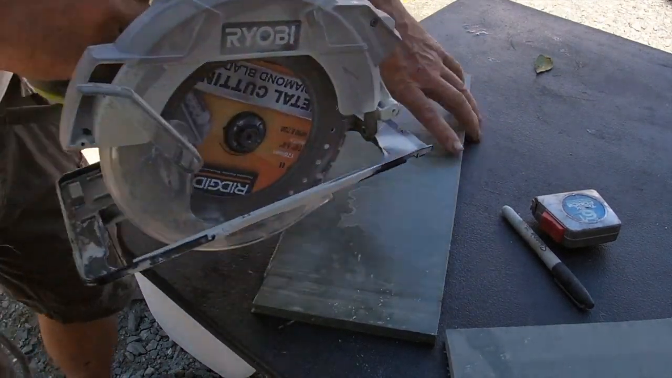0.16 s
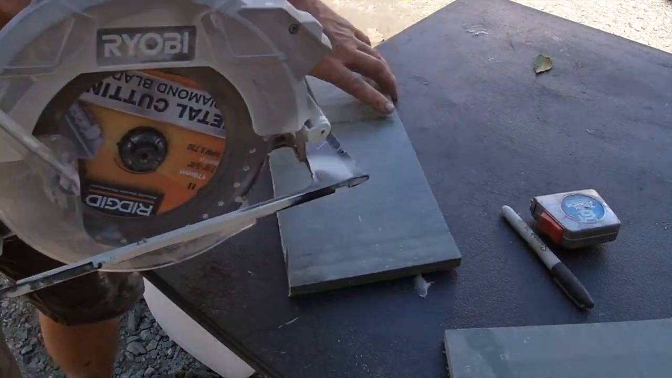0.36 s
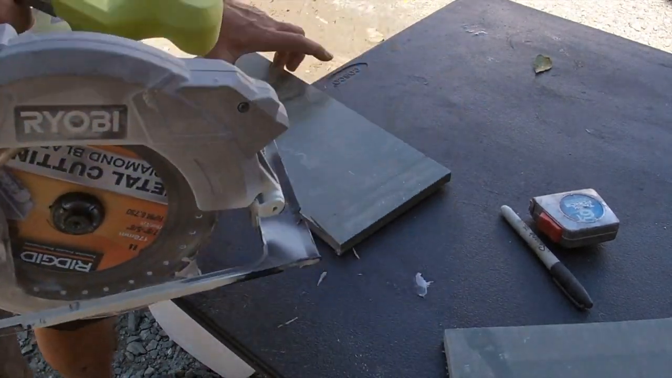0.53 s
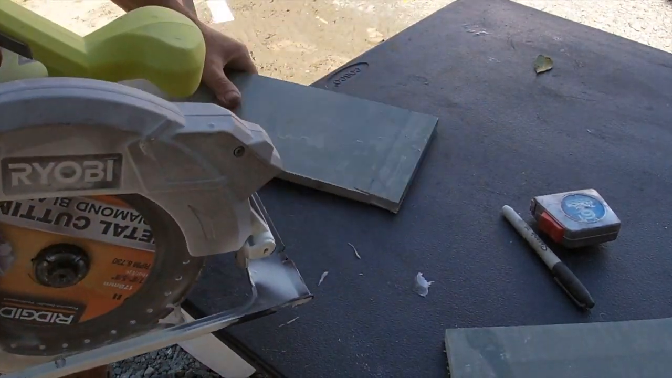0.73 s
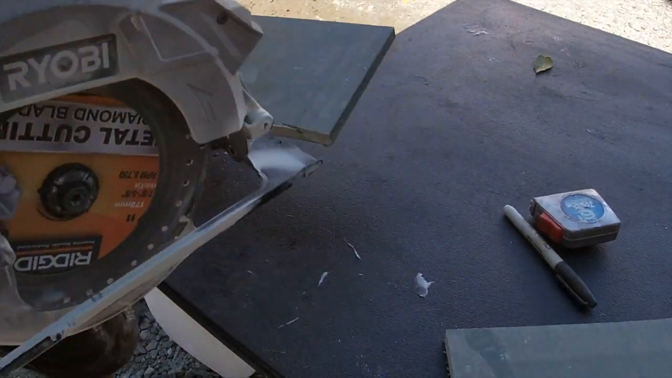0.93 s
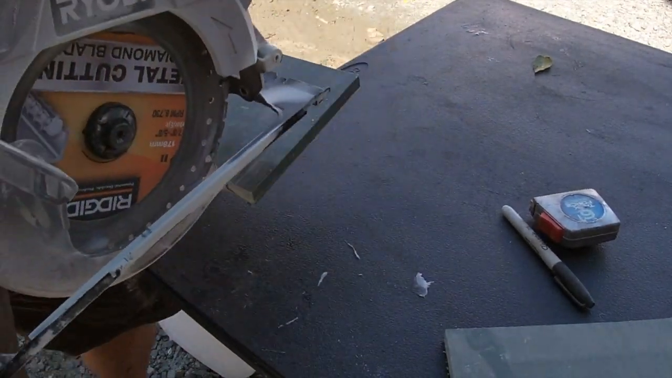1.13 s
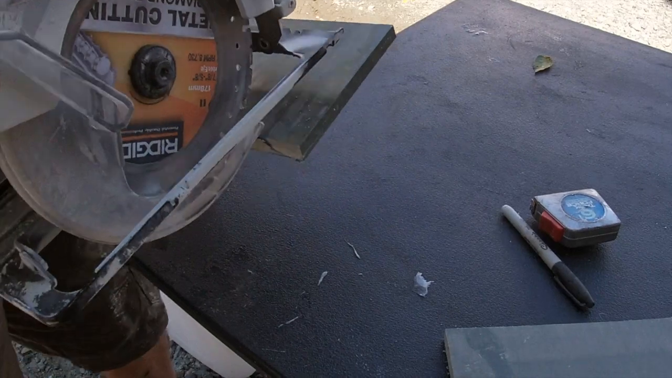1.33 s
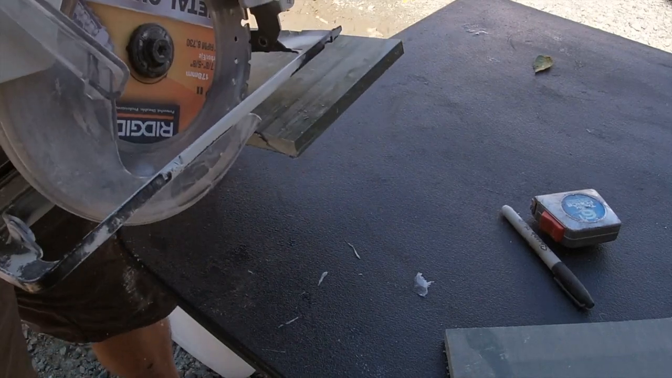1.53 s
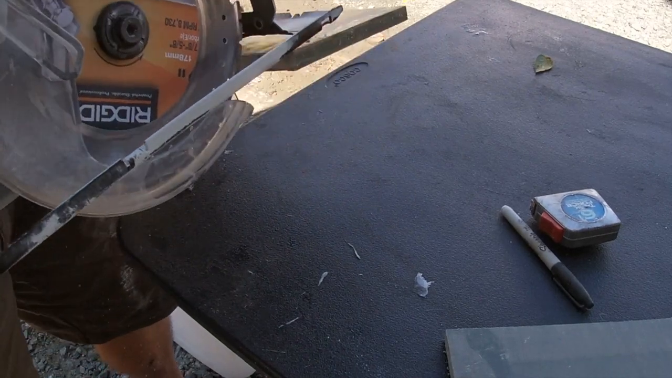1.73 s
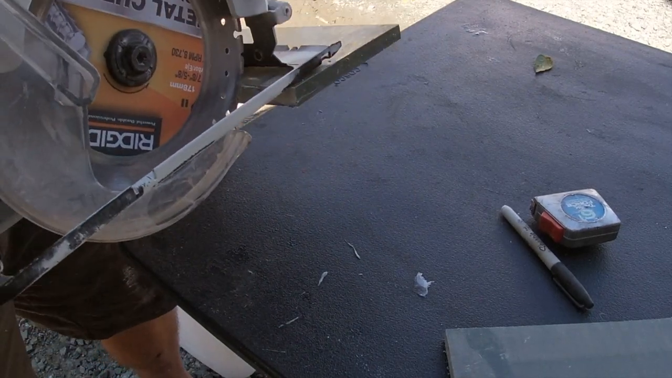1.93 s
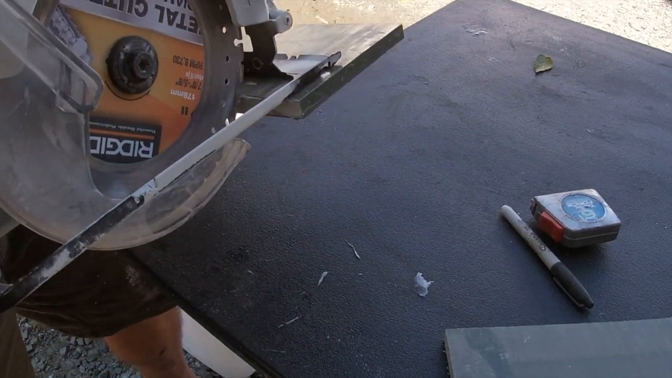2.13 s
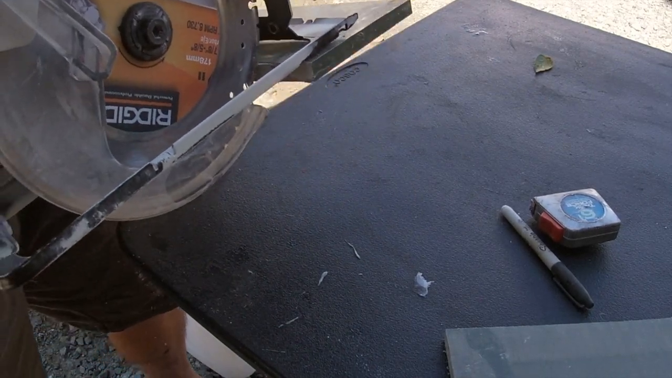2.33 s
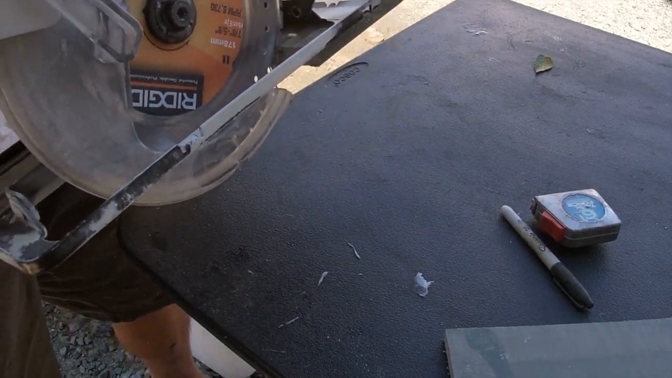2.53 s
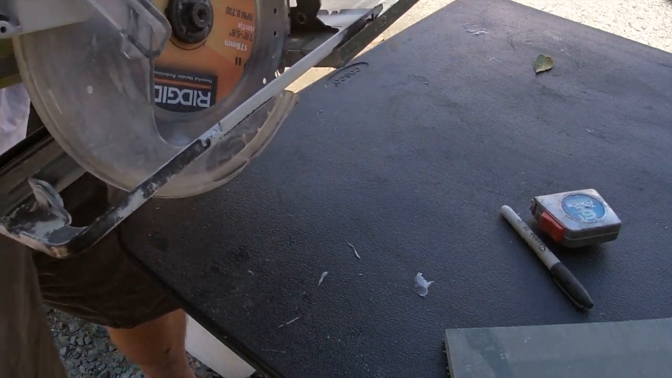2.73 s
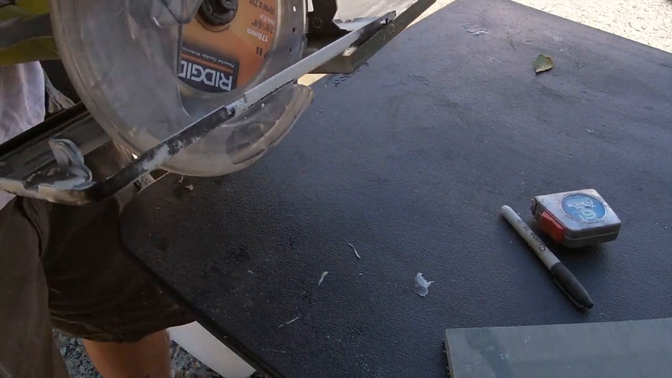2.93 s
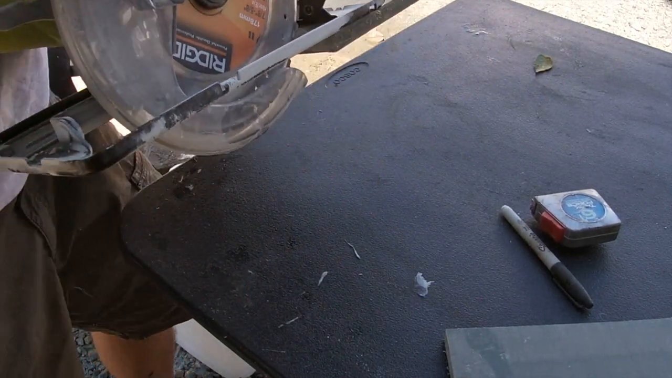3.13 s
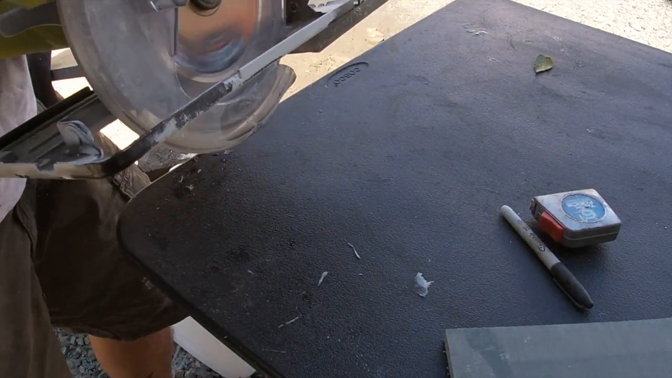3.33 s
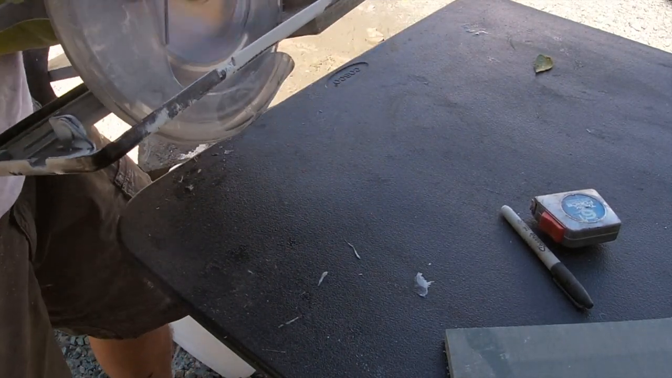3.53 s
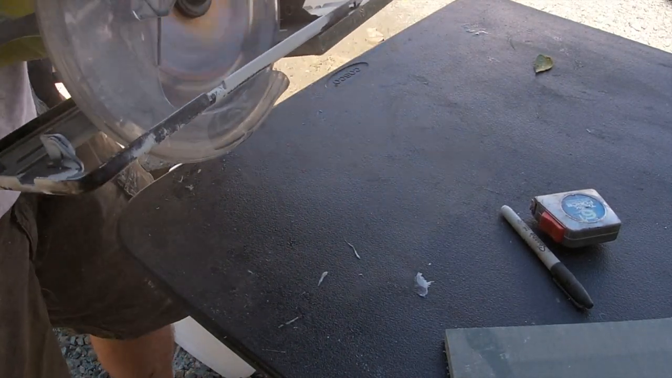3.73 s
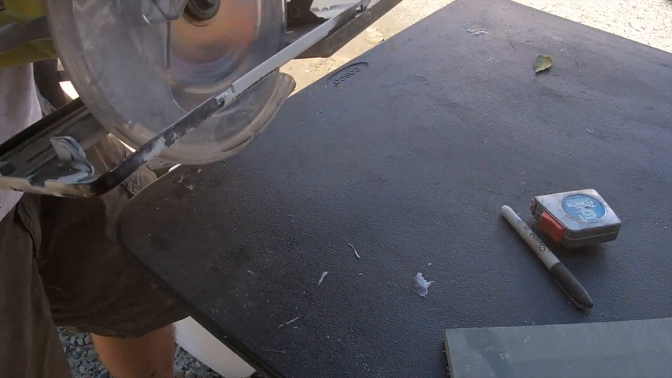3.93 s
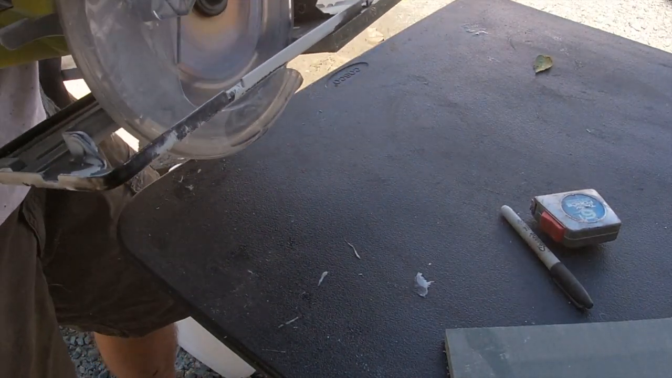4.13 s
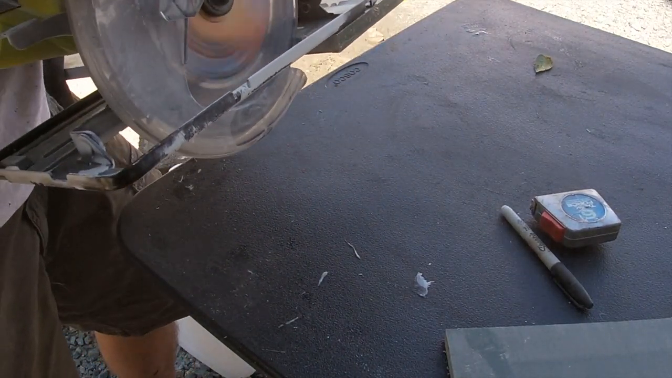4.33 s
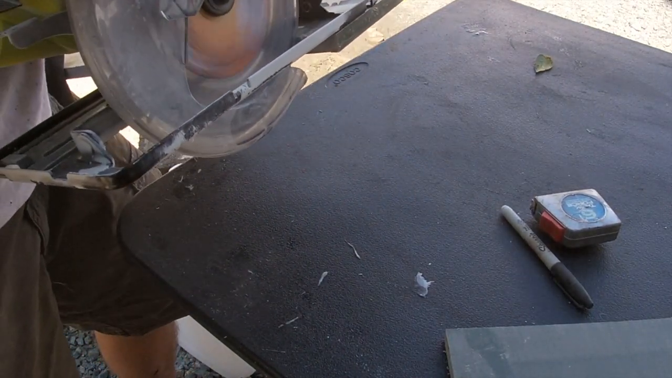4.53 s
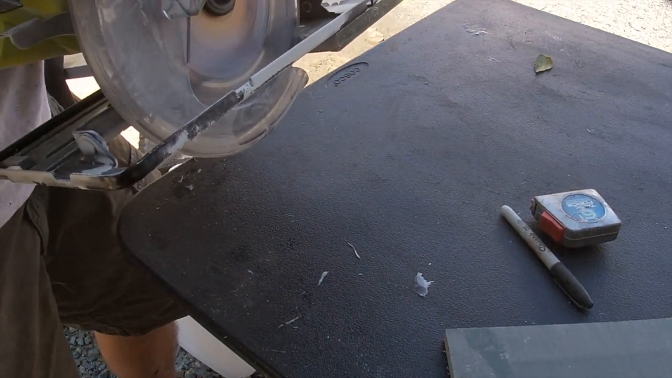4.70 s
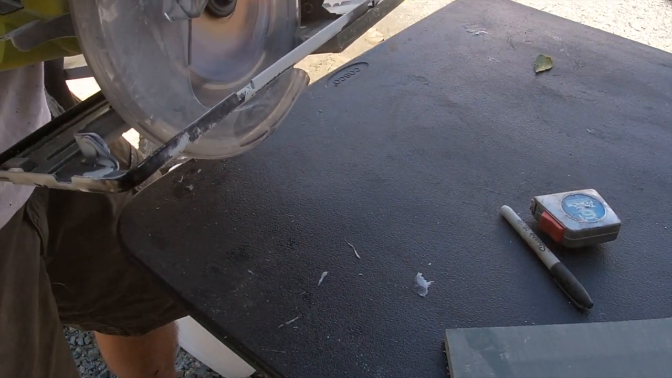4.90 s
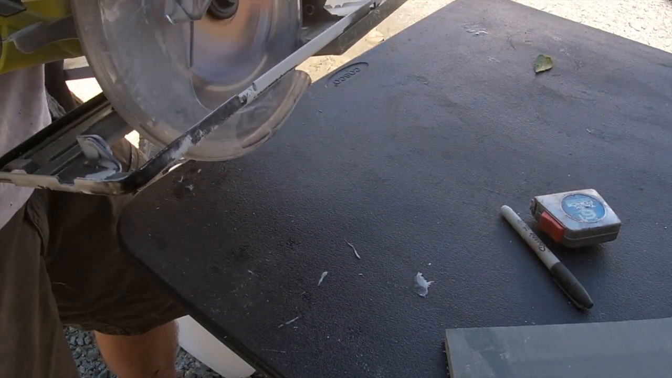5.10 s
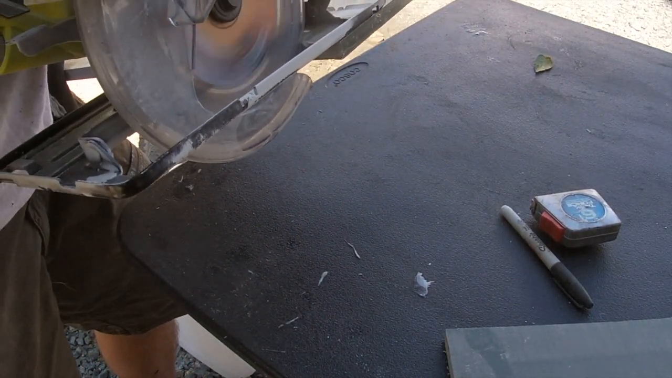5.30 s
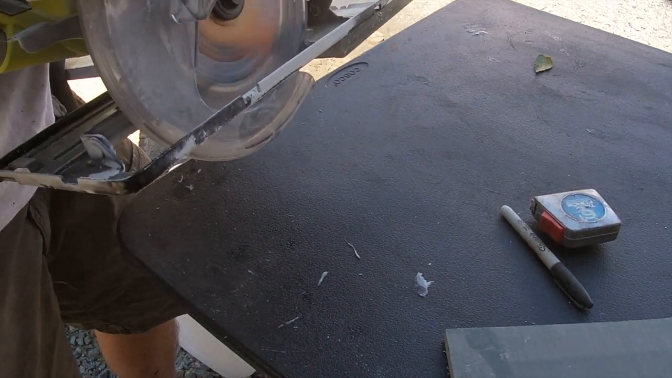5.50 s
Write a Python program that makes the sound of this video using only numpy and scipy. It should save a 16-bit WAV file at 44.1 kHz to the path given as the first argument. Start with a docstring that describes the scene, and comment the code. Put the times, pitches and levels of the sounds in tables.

```python
"""Outdoors, at a folding table: a circular saw is handled, then switched on and left spinning free.
A board slides and bumps on the hollow top; shoe and guard knock; a distant machine hums.
Noise through set spectra makes air, rubbing and rattle; decaying sines make the struck parts.
The motor clatters and runs up: fan rush, harmonic buzz, gear whine at 15 teeth a turn, and a
steel blade whose modes split with spin and ring when it grazes something."""
import sys
import numpy as np
from scipy import signal
from scipy.fft import rfft, irfft
from scipy.io import wavfile
from scipy.ndimage import uniform_filter1d

SR = 44100
rng = np.random.default_rng(int(sys.argv[2]) if len(sys.argv) > 2 else 0)


def generate_wav(signal):
    """Clip the signal to [-1, 1] and save it as 16-bit WAV at the path in sys.argv[1]."""
    frames = np.transpose(np.atleast_2d(signal))
    scaled = np.clip(frames, -1, 1) * 32767
    pcm = np.round(scaled).astype(np.int16)
    wavfile.write(sys.argv[1], SR, pcm)


N = 249606
T = np.arange(N) / SR

# Motor and blade turns per second at the reference speed.
MOTOR_REF_HZ, BLADE_REF_HZ = 414.5, 85
# Run-up from START_S towards TOP_HZ: a quick pull and a slower creep, each with its time constant.
START_S, TOP_HZ, PULL_S, CREEP_S, PULL_SHARE = 3.297, 419.17, .1675, .3364, .51
# Fall in motor turns per second between two times.
SAG_HZ, SAG_FROM_S, SAG_TO_S = 5.7, 4.9, 5.49
# Cooling-air spectrum. Each row: frequency in Hz, relative density in dB per Hz.
AIR_SPECTRUM = [(650, -39), (1100, -11.5), (1620, -3), (2310, -7), (2910, -2.5), (3180, -4.5), (3360, 2),
                (3630, -2.5), (5230, -5), (6030, -4.5), (6590, -9), (7780, -4), (8790, -16.5),
                (14400, -31.5), (15400, -66)]
# Cooling-air rush: level running free, change at standstill, change while the blade rings.
RUSH_DB, RUSH_STILL_DB, RUSH_RINGING_DB = -20.5, -4.5, -3.5
# Low air roar spectrum. Each row: frequency in Hz, relative density in dB per Hz.
ROAR_SPECTRUM = [(40, -24), (130, -9.5), (320, -10.5), (440, -3), (650, -10), (820, 1), (1000, -3),
                 (1200, -13.5), (2000, -45)]
# Roar: level running free, change while the blade rings, and a dying surge at switch-on.
ROAR_DB, ROAR_RINGING_DB, SURGE_DB, SURGE_HOLD_S, SURGE_FALL_S = -32, -4.5, -25.5, 0.039, 0.029
# Fuzzy fan tones. Each row: multiple of motor speed, width in Hz, level in dB at reference speed.
FAN_TONES = [(1, 40, -47.5), (4, 90, -39.5), (5, 40, -41), (7, 220, -31), (8.15, 110, -34), (14, 20, -38.5)]
# Harmonic buzz under hard pull.
BUZZ_START_S, BUZZ_HOLD_S, BUZZ_RISE_S, BUZZ_FALL_S, BUZZ_DB = 3.44, 0.25, .04, 0.059, -30
# Gear clatter spectrum. Each row: frequency in Hz, relative density in dB per Hz.
CLATTER_SPECTRUM = [(88, -48), (150, -30), (237, -1.5), (395, -56), (460, -37), (647, -14), (1020, 1.5),
                    (1160, -6), (1330, 10), (1840, -10.5), (2900, -5), (6310, -26), (7070, -20),
                    (8230, -38), (14000, -58)]
# Gears taking up slack: a clatter that weakens, then stops.
CLATTER_DB, CLATTER_SAG_DB_PER_S, CLATTER_HOLD_S, CLATTER_FALL_S = -15.5, 45, 0.16, 0.064
# Tooth chatter under hard pull. Each row: start in seconds, length in seconds, level in dB.
CHATTER_BURSTS = [(3.425, 0.068, -26), (3.66, 0.033, -31)]
CHATTER_RISE_S, CHATTER_FALL_S, CHATTER_WIDTH_HZ = .025, .03, 300
# Clean gear whine: holds while slowly weakening, then dies away.
WHINE_START_S, WHINE_HOLD_S, WHINE_RISE_S, WHINE_FALL_S = 3.845, 1.4, 0.01, .17
WHINE_DB, WHINE_SAG_DB_PER_S = -24.5, 0.5
# Blade modes. Each row: frequency in Hz at reference speed, waves round the rim (+ with the spin,
# - against it), then levels in dB grazing in the run-up, running free, and grazing at speed.
BLADE_MODES = [(1339, 0, -38, -44, -33), (1820, 2, -43, -54, -41), (2499, 3, -39, -41, -34),
               (2751, 3, -44, -51, -37), (3025, 1, -48, -39, -43), (3326, 2, -35, -33, -36),
               (3404, 4, -35, -34, -35), (3585, -4, -36, -46, -38), (3619, 0, -34, -45, -38),
               (3865, 0, -45, -40, -29), (4011, 1, -40, -40, -35), (4325, 4, -34, -50, -42),
               (4515, 5, -35, -46, -42), (4619, -5, -36, -42, -38), (4858, 0, -40, -43, -50),
               (5170, 4, -37, -55, -45), (5509, 5, -35, -45, -38), (5642, -6, -33, -44, -35),
               (6331, 3, -33, -41, -31), (6675, 6, -38, -40, -30), (6890, 2, -42, -35, -37),
               (6980, 8, -37, -42, -50), (7061, 0, -33, -42, -32), (7630, -5, -33, -42, -39),
               (7933, 6, -38, -37, -36), (9170, 4, -39, -48, -47), (9478, 6, -44, -53, -46)]
# Blade contact. Each row: time in seconds, strength as a share 0-1.
GRAZE_STRENGTH = [(3.8, 0.99), (4.03, 0), (5.08, 0.22), (5.2, 0.76), (5.4, 0.98)]
# Broad guard and blade resonances. Each row: centre in Hz, width in Hz, then levels in dB
# in the run-up and at speed, before the grazing gain.
GUARD_BANDS = [(1335, 130, -41, -34.5), (3570, 300, -42, -52), (7120, 190, -29, -30), (7690, 310, -39, -43)]
# Weak high blade modes. Each row: frequency in Hz, level of each mode in dB before the grazing gain.
SHIMMER_LEVELS = [(2500, -58), (7600, -38.5), (8600, -49.5), (10000, -49.5), (12000, -64.5), (15000, -73)]
# Singing blade modes. Each row: start in seconds, length in seconds, frequency in Hz at reference
# speed, signed waves round the rim, mean level in dB.
SINGING_MODES = [(3.81, .23, 4625, -5, -29), (5.2, .46, 5509, 5, -33)]
# Draught on the microphone. Each row: start in seconds, length in seconds, level in dB.
GUST_EVENTS = [(3.5, 0.277, -33.5), (5.38, 0.25, -35.5)]
GUST_RISE_S, GUST_FALL_S, DRAUGHT_DB = 0.22, .04, -67
# Each row: frequency in Hz, relative density in dB per Hz.
DRAUGHT_SPECTRUM = [(15, -11), (45, 0.5), (90, -2.5), (180, -8.0), (400, -25.0)]
# Sliding-board spectrum. Each row: frequency in Hz, relative density in dB per Hz.
SLIDE_SPECTRUM = [(120, -30), (200, 4.5), (285, -18), (329, -7.5), (772, -9), (956, -20), (1180, -9),
                  (1390, -17), (1850, -13), (2630, -16), (2880, -14), (7380, -25), (14000, -60)]
# Board slide: swells to its peak and dies away.
SLIDE_PEAK_S, SLIDE_DB, SLIDE_RISE_DB_PER_S, SLIDE_FALL_DB_PER_S = 0.5, -27.5, 30, 65
# Board sticking and juddering. Each row: start in seconds, length in seconds, level in dB.
JUDDER_EVENTS = [(0.0, .04, -31.5), (.295, .025, -19), (.56, 0.092, -20), (.78, 0.046, -24)]
JUDDER_RISE_S, JUDDER_FALL_S = 0.021, 0.055
# Bumps on the table. Each row: time in seconds, peak level in dB, contact time in seconds.
BUMP_EVENTS = [(.297, -8, 0.0031), (.581, -18, 0.00043), (.772, -7, 0.0035), (.779, -11.5, 0.00054),
               (.844, -16, 0.0011)]
# Hollow table modes. Each row: frequency in Hz, level in dB, 60 dB decay time in seconds.
TABLE_MODES = [(132, -3.5, 0.27), (169, -9, 0.13), (223, -10, 0.21), (273.3, -6, 0.17), (392, 1.5, 0.096),
               (536, -4, 0.15), (775, -3, 0.058)]
# Knocks of shoe, guard and board. Each row: time in seconds, overall gain in dB, pitch of the struck
# part in Hz, then clack and treble snap in dB relative to that gain.
KNOCK_EVENTS = [(0.085, -23, 633, -18.5, -34), (0.296, -16.5, 753, -5.5, -35), (0.522, -18, 735, -4, -16),
                (0.767, -20.5, 667, 0.5, -23), (0.843, -27.5, 710, -9.5, -20), (0.881, -43.5, 678, 5, -7),
                (1.066, -32, 824, -9, -28), (1.175, -31, 1385, -6, -20), (1.261, -7, 1468, -6, -24),
                (1.275, -19.5, 1407, -15, -13), (1.301, -16.5, 1430, -5, -16),
                (1.341, -27, 1360, -18, -30.5), (1.81, -11, 833, -3.5, -38), (1.839, -15.5, 954, -6, -26),
                (1.887, -26, 920, -25, -36), (2.177, -27, 966, -7, -3), (2.408, -33.5, 898, -6.5, -15),
                (2.521, -35.5, 730, -23, -20), (2.716, -30, 834, -11, -26), (2.892, -30.5, 1330, -6, -16),
                (2.995, -22.5, 733, 0, -10), (3.088, -19, 910, -3, -21), (3.135, -42, 890, -22, 13),
                (3.194, -25.5, 730, -6, -5), (3.238, -22, 950, -4, -25), (3.245, -33.5, 1350, -10, 9),
                (3.297, -11.5, 1384, -1.5, -7.5)]
# Knock rattle spectrum. Each row: frequency in Hz, relative density in dB per Hz.
RATTLE_SPECTRUM = [(120, -44), (200, -5), (268, -27), (329, -12.5), (471, -8.5), (967, -1.5), (1190, -8.5),
                   (1410, -2), (1700, -18), (2240, -29.5), (3560, -26), (3940, -24), (7060, -28),
                   (12000, -64), (15600, -90), (22000, -120)]
# Clack and snap spectra, same columns.
CLACK_SPECTRUM = [(600, -41), (1800, 7), (2600, 7.0), (3600, 1.0), (7000, -17.5), (12000, -64)]
SNAP_SPECTRUM = [(1500, -26), (4500, 0.5), (7000, 1), (9000, -15.5), (15000, -41)]
# Metal shoe modes. Each row: frequency in Hz, level in dB, 60 dB decay time in seconds.
SHOE_MODES = [(584, -13, 0.21), (766, -9.5, 0.17), (926, 3.5, 0.049), (1370, -9, 0.13), (1577, -6, 0.1),
              (1920, -16.5, 0.21), (2200, -33, 1), (2860, -6, .1), (3550, -20, 0.19)]
# Hands shifting on the housing. Each row: start in seconds, length in seconds, level in dB.
RUB_EVENTS = [(1.07, 0.078, -48.5), (1.447, 0.044, -49.5), (1.66, 0.039, -45), (2.15, 0.046, -44.5),
              (3.005, 0.048, -41.5), (3.1, 0.046, -36.5), (3.205, 0.078, -37.5)]
RUB_RISE_S, RUB_FALL_S = 0.021, 0.018
# Plastic housing. Each row: frequency in Hz, relative density in dB per Hz.
HOUSING_SPECTRUM = [(300, -13), (600, -4.0), (900, 2.5), (1300, -3.5), (3000, -12.0), (7000, -13.5),
                    (9000, -28.5), (15000, -46)]
HUM_HZ = 106.4
# Distant machine's partials. Each row: multiple of HUM_HZ, relative level in dB.
HUM_PARTIALS = [(1, 0.5), (1.599, -13.5), (2, -16.5), (3, -24.5), (4, -33), (5, -32)]
# Distant hum before the sink. Each row: time in seconds, level in dB.
HUM_LEVELS = [(0.95, -43), (1.15, -38), (1.77, -49.5), (2.27, -33), (3.25, -36), (3.28, -36)]
# Open-air spectrum. Each row: frequency in Hz, relative density in dB per Hz.
YARD_SPECTRUM = [(15, -57), (25, -21), (54, -9.5), (82, -8.5), (113, -12.5), (155, -11.5), (264, -21),
                 (703, -29), (892, -23), (1050, -29), (1970, -36), (3630, -33), (4850, -43), (7420, -35),
                 (14000, -87)]
# Open air, and how far and how fast it and the hum sink from switch-on.
OPEN_AIR_DB, SINK_DB, SINK_S = -43.5, -17.5, 0.044
BAND_LIMIT_HZ = 15350


def amp(db):
    """Decibels to gain."""
    return 10 ** (np.asarray(db) / 20)


def unit(x):
    """Scales to an rms of 1."""
    return x / np.sqrt(np.mean(x ** 2) + 1e-20)


def curve(rows, axis=1):
    """One table column, joined by straight lines in time."""
    rows = np.asarray(rows, float)
    return np.interp(T, rows[:, 0], rows[:, axis])


def since(s):
    """Seconds gone by since time s; 0 before it."""
    return np.maximum(T - s, 0)


def add(mix, s, sound):
    """Mixes a sound in at time s."""
    part = mix[max(round(s * SR), 0):][:len(sound)]
    part += sound[:len(part)]


def noise(size=N):
    """White noise."""
    return rng.standard_normal(size)


def drift(hz):
    """Random wander through 2 * hz points a second; rms 1."""
    return unit(np.interp(T * 2 * hz, np.arange(8000), noise(size=8000)))


def grains(per_s, spread_db):
    """Random clicks, a few much larger than the rest; rms 1."""
    clicks = (rng.random(N) < per_s / SR) * noise()
    return unit(clicks * amp(spread_db * np.minimum(rng.exponential(1, N), 4)))


def colour(x, points):
    """Filters by a (Hz, dB) spectrum, linear in log frequency; rms 1."""
    hz, db = np.transpose(points)
    f = np.fft.rfftfreq(len(x), 1 / SR)
    gain = amp(np.interp(np.log(f + 1), np.log(hz + 1), db))
    return unit(irfft(rfft(x) * gain, len(x)))


def patchy(x, depth_db):
    """Turbulence and uneven contact: level wanders in patches of about 500 Hz by 30 ms; rms 1."""
    z = signal.stft(x, nperseg=512, noverlap=384)[2]
    field = uniform_filter1d(noise(size=z.shape), size=6, axis=0)
    field = uniform_filter1d(field, size=10, axis=1)
    return unit(signal.istft(z * amp(depth_db * unit(field)), nperseg=512, noverlap=384)[1][:N])


def turns(hz):
    """Phase in radians of a frequency or frequency curve, from a random start."""
    return 2 * np.pi * (np.cumsum(hz * np.ones(N)) / SR + rng.random())


def fuzzy(hz, width_hz):
    """Narrow noise band centred on hz; rms 1."""
    phase = turns(hz)
    return unit(drift(width_hz / 2) * np.cos(phase) + drift(width_hz / 2) * np.sin(phase))


def ring(modes, t):
    """Decaying modes after one blow, with alternating signs."""
    out = 0
    for k, (hz, db, t60_s) in enumerate(modes):
        out = out + (-1) ** k * amp(db - 60 * t / t60_s) * np.sin(2 * np.pi * hz * t)
    return out


def envelope(start_s, length_s, rise_s, fall_s):
    """Exponential swell to 1 at start, hold, exponential fall."""
    early, late = np.maximum(start_s - T, 0), np.maximum(T - start_s - length_s, 0)
    return np.exp(-early / rise_s - late / fall_s)


def strokes(rows, rise_s, fall_s):
    """Gain of (start s, length s, dB) events sharing one attack and release."""
    return sum(amp(db) * envelope(start, length, rise_s, fall_s) for start, length, db in rows)


def motor_speed():
    """Turns per second: the motor closes in on its top speed, then sags a little."""
    t = since(START_S)
    to_go = PULL_SHARE * np.exp(-t / PULL_S) + (1 - PULL_SHARE) * np.exp(-t / CREEP_S)
    return TOP_HZ * (1 - to_go) - np.interp(T, [SAG_FROM_S, SAG_TO_S], [0, SAG_HZ])


def motor(speed, graze):
    """Fan air modulated once a turn, plus fan tones; the air is quieter while the blade rings."""
    shaft, spin = turns(speed), speed / MOTOR_REF_HZ
    rush_db = RUSH_DB + RUSH_STILL_DB * (1 - spin) ** 2 + RUSH_RINGING_DB * graze
    rush = patchy(colour(noise() + 0.34 * grains(2500, 3.1), AIR_SPECTRUM), depth_db=2.5)
    rush = rush * amp(rush_db + .5 * drift(25))
    surge = amp(SURGE_DB) * np.exp(-since(START_S + SURGE_HOLD_S) / SURGE_FALL_S)
    roar_gain = amp(ROAR_DB + ROAR_RINGING_DB * graze) + surge
    roar = patchy(colour(noise(), ROAR_SPECTRUM), depth_db=1.5) * roar_gain
    air = (rush + roar) * (1 + 0.23 * np.cos(shaft))
    fan = sum(amp(db + 2.1 * drift(30)) * fuzzy(k * speed, width) for k, width, db in FAN_TONES)
    return air + fan * spin ** 2


def buzz(speed, waver_db=5.5):
    """Wavering shaft harmonics 7 to 23 glide up with the speed and fade as the load eases."""
    stack = sum(amp(waver_db * drift(7)) * np.sin(turns(k * speed)) for k in range(7, 24))
    return amp(BUZZ_DB) * unit(stack) * envelope(BUZZ_START_S, BUZZ_HOLD_S, BUZZ_RISE_S, BUZZ_FALL_S)


def gears(speed):
    """Gears clatter through the slack, chatter under hard pull, then whine at 15 teeth a turn."""
    mesh_hz = 15 * speed
    slack = amp(CLATTER_DB - CLATTER_SAG_DB_PER_S * since(START_S) + drift(70))
    slack = slack * np.exp(-since(START_S + CLATTER_HOLD_S) / CLATTER_FALL_S)
    clatter = slack * patchy(colour(noise() + 0.5 * grains(1500, 2.4), CLATTER_SPECTRUM), depth_db=0.0)
    bursts = strokes(CHATTER_BURSTS, CHATTER_RISE_S, CHATTER_FALL_S)
    chatter = fuzzy(mesh_hz, CHATTER_WIDTH_HZ) * bursts
    whine = unit(np.sin(turns(mesh_hz) + .16 * drift(40)))
    whine = whine * envelope(WHINE_START_S, WHINE_HOLD_S, WHINE_RISE_S, WHINE_FALL_S)
    whine_db = WHINE_DB - WHINE_SAG_DB_PER_S * since(WHINE_START_S) + 1.1 * drift(25)
    return clatter + chatter + whine * amp(whine_db)


def blade_lag(speed):
    """Blade turns per second relative to the reference speed: the shift in Hz per wave round the rim."""
    return BLADE_REF_HZ * (speed / MOTOR_REF_HZ - 1)


def blade(speed, graze, flutter=0.35, flutter_hz=16):
    """Spin raises waves that run with the blade and lowers those against it; grazing feeds them."""
    lag_hz = blade_lag(speed)
    at_speed = T > 4.5
    out = np.zeros(N)
    for hz, waves, early_db, free_db, late_db in BLADE_MODES:
        grazing = np.where(at_speed, amp(late_db), amp(early_db))
        level = graze * grazing + (1 - graze) * amp(free_db)
        phase = turns(hz + waves * lag_hz)
        swell = amp(2.2 * drift(3))  # contact favours now one mode, now another
        in_phase = (1 + flutter * drift(flutter_hz / 2)) * np.sin(phase)
        quadrature = flutter * drift(flutter_hz) * np.cos(phase)
        out += level * unit(swell * (in_phase + quadrature))
    out += shimmer(lag_hz) * (0.12 + 1.9 * graze)
    out *= np.interp(T, [3.33, 3.46], [.1, 1])  # ringing takes a moment to build
    for hz, width, early_db, late_db in GUARD_BANDS:
        level = np.where(at_speed, amp(late_db), amp(early_db))
        out += (0.18 + 1.35 * graze) * level * fuzzy(hz, width)
    return out


def shimmer(lag_hz, count=44):
    """Weak modes scattered through the treble, bent up or down by the spin."""
    pitches_hz = np.linspace(2600, 15000, count) + rng.uniform(-90, 90, count)
    waves = rng.integers(-6, 10, count)
    levels = amp(np.interp(pitches_hz, *np.transpose(SHIMMER_LEVELS)) + 2 * noise(size=count))
    return sum(g * (1.04 + .5 * drift(14)) * np.sin(turns(hz + k * lag_hz))
               for hz, k, g in zip(pitches_hz, waves, levels))


def singing(speed, rise_s=0.029, fall_s=.03, waver_db=3.0):
    """At set times one wave round the blade's rim builds up into a clear whistle."""
    lag_hz = blade_lag(speed)
    out = np.zeros(N)
    for start, length, hz, waves, db in SINGING_MODES:
        gain = amp(db + waver_db * drift(14)) * envelope(start, length, rise_s, fall_s)
        out += gain * unit(np.sin(turns(hz + waves * lag_hz)))
    return out


def draught():
    """Air from the saw buffets the microphone as low rumble."""
    rumble = colour(noise(), DRAUGHT_SPECTRUM)
    gain = amp(DRAUGHT_DB) + strokes(GUST_EVENTS, GUST_RISE_S, GUST_FALL_S)
    return rumble * gain * amp(2.2 * drift(12))


def board():
    """Grit scrapes under the board; its stick and slip, and its bumps, make the hollow top boom."""
    grit = patchy(colour(grains(5000, 2.1), SLIDE_SPECTRUM), depth_db=3)
    rise_db = SLIDE_RISE_DB_PER_S * np.maximum(SLIDE_PEAK_S - T, 0)
    fall_db = SLIDE_FALL_DB_PER_S * since(SLIDE_PEAK_S)
    scrape = grit * amp(SLIDE_DB - rise_db - fall_db + drift(49.7))
    slip = np.sin(turns(130 * (1 + 0.062 * drift(18)))) + 0.43 * fuzzy(150, 130)
    judder = slip * strokes(JUDDER_EVENTS, JUDDER_RISE_S, JUDDER_FALL_S) * amp(drift(24))
    out = scrape + judder
    t = T[:SR // 2]
    leak = signal.butter(2, 85, "high", fs=SR, output="sos")  # an open panel radiates little deep bass
    for s, db, contact_s in BUMP_EVENTS:
        push = t * np.exp(-2 * t / max(contact_s, 1e-4))  # longer contact, duller bump
        bump = signal.sosfilt(leak, signal.fftconvolve(push, ring(TABLE_MODES, t))[:len(t)])
        add(out, s, amp(db) * bump / abs(bump).max())
    return out


def knocks(rattle_db=-5, shoe_db=-3, part_db=-6, part_t60_s=0.11, decay_s=0.0074, snap_s=0.007,
           tail_db=-26, tail_s=0.054, rise_s=0.0019):
    """Each knock rings the struck part and the metal shoe, with a rattle, a clack and a bright snap."""
    out, t = np.zeros(N), T[:16384]
    shoe = ring(SHOE_MODES, t)
    shoe /= abs(shoe).max()
    fall = np.exp(-t / decay_s) + amp(tail_db) * np.exp(-t / tail_s)
    for s, db, hz, clack_db, snap_db in KNOCK_EVENTS:
        rattle = amp(rattle_db) * colour(noise(size=len(t)), RATTLE_SPECTRUM)
        clack = amp(clack_db) * colour(noise(size=len(t)), CLACK_SPECTRUM)
        snap = amp(snap_db) * colour(noise(size=len(t)), SNAP_SPECTRUM)
        snap = snap * np.exp(-t / snap_s) * np.minimum(t / 0.0002, 1)
        tone = amp(shoe_db) * shoe + ring([(hz, part_db, part_t60_s)], t)
        body = ((rattle + clack) * fall + tone) * (1 - np.exp(-t / rise_s))
        add(out, s - .0005, amp(db) * (body + snap))
    return out


def hands():
    """Uneven rubbing on the plastic housing: noise and clicks through its spectrum."""
    rub = noise() + .5 * grains(1500, 2.5)
    rub = patchy(colour(rub, HOUSING_SPECTRUM), depth_db=2.0)
    return rub * strokes(RUB_EVENTS, RUB_RISE_S, RUB_FALL_S)


def yard():
    """A distant machine hums in wavering partials in open air; both sink once the saw starts."""
    phase = turns(HUM_HZ * (1 + 0.003 * drift(4.02)))
    hum = unit(sum(amp(db + 2.1 * drift(4.08)) * np.sin(k * phase) for k, db in HUM_PARTIALS))
    air = colour(noise(), YARD_SPECTRUM)
    sink = amp(SINK_DB * np.minimum(since(START_S) / SINK_S, 1))
    return sink * (hum * amp(curve(HUM_LEVELS)) + air * amp(OPEN_AIR_DB))


def scene():
    """Sums all sources in the middle; the saw fades in over 2 ms at switch-on."""
    speed, graze = motor_speed(), np.clip(curve(GRAZE_STRENGTH), 0, 1)
    switched_on = np.minimum(since(START_S) / 0.002, 1)
    saw = motor(speed, graze) + buzz(speed) + gears(speed)
    saw = saw + blade(speed, graze) + singing(speed) + draught()
    mix = switched_on * saw + board() + knocks() + hands() + yard()
    return np.array([mix, mix])


def record(dry):
    """The two channels part only in the top treble; then the band limit."""
    top = signal.sosfilt(signal.butter(14, 11400, "high", fs=SR, output="sos"), dry[0])
    scatter = noise(size=600)
    side = signal.oaconvolve(top, scatter / np.linalg.norm(scatter))[:N]
    wide = dry + 0.35 * np.array([[1], [-1]]) * side
    lowpass = signal.firwin(511, BAND_LIMIT_HZ, window=("kaiser", 9), fs=SR)
    return signal.oaconvolve(wide, lowpass[None], "same")


dry = scene()
out = record(dry)
generate_wav(out)
```